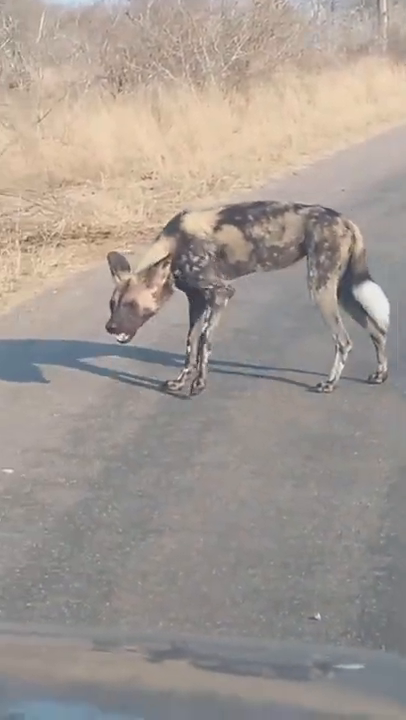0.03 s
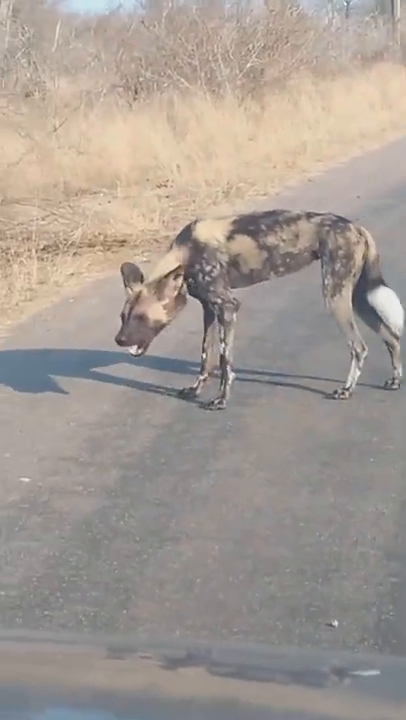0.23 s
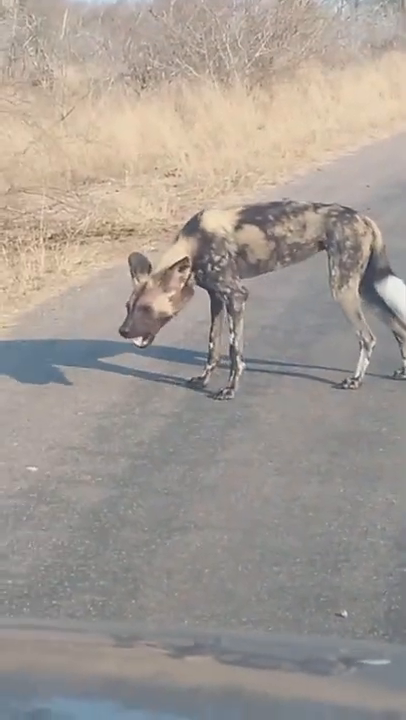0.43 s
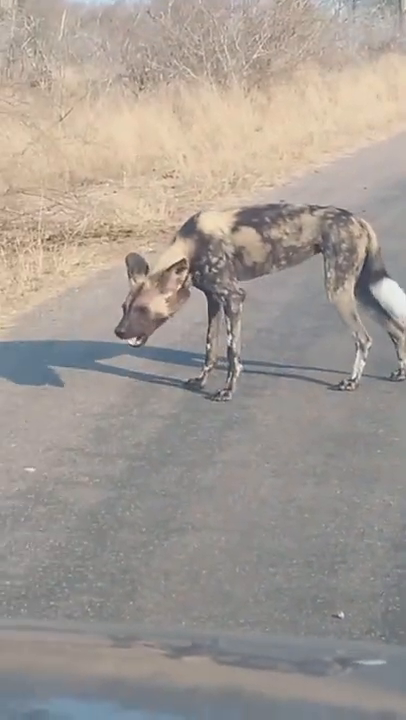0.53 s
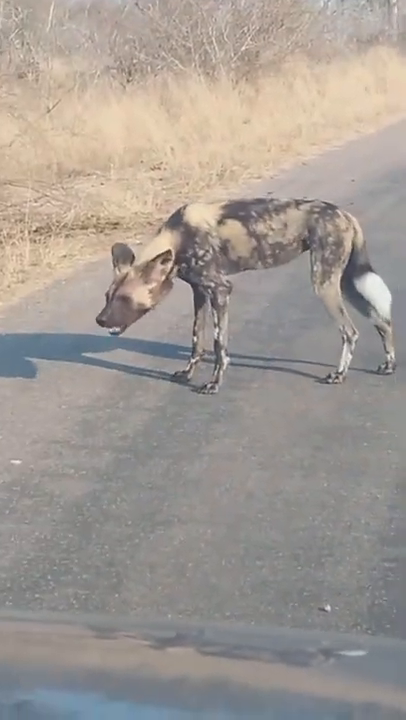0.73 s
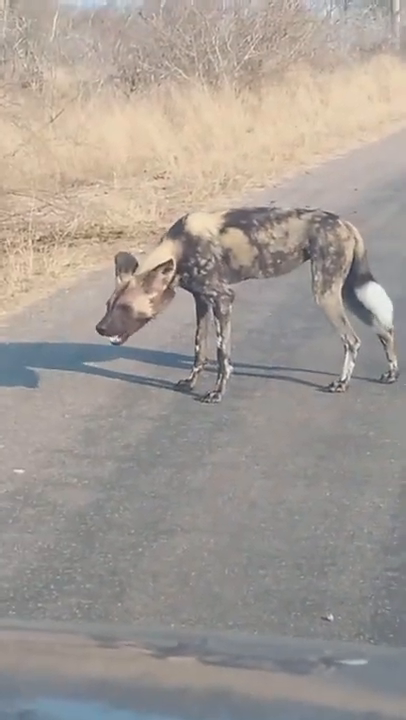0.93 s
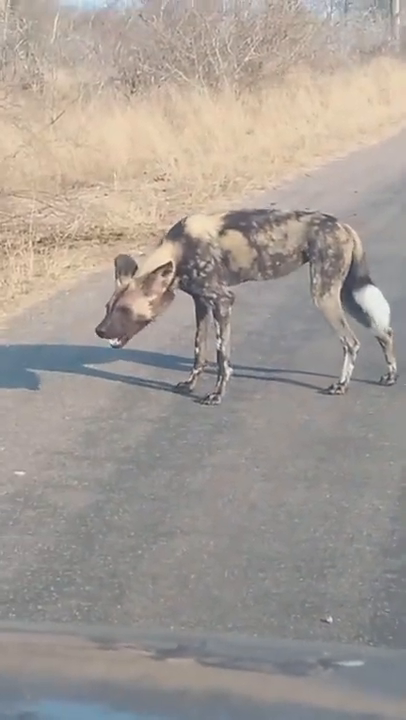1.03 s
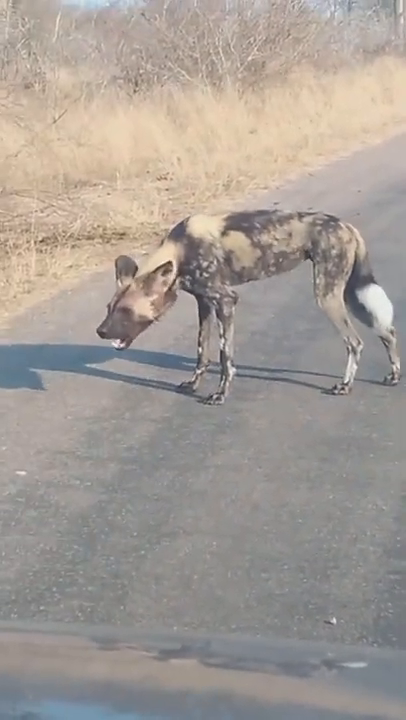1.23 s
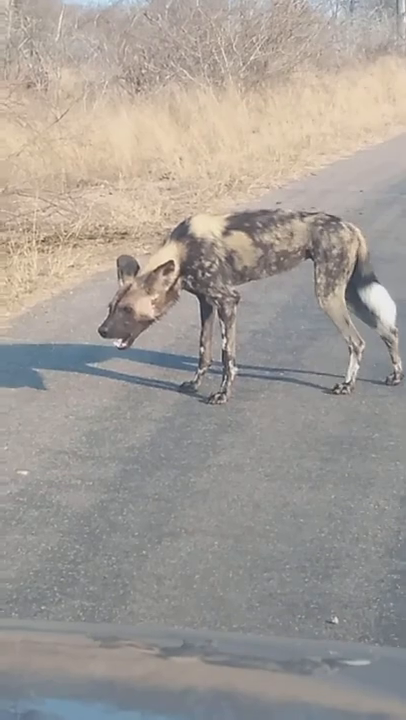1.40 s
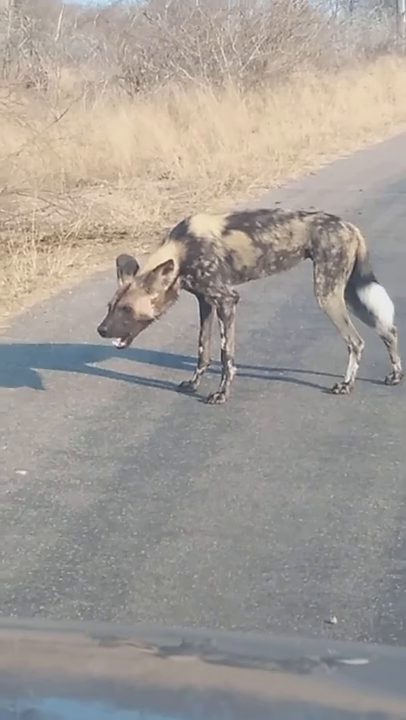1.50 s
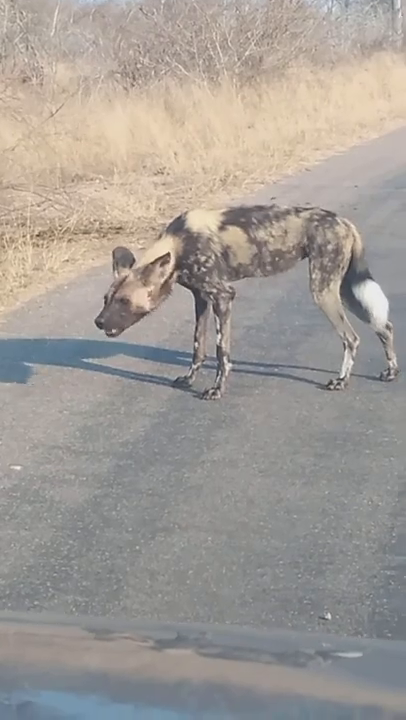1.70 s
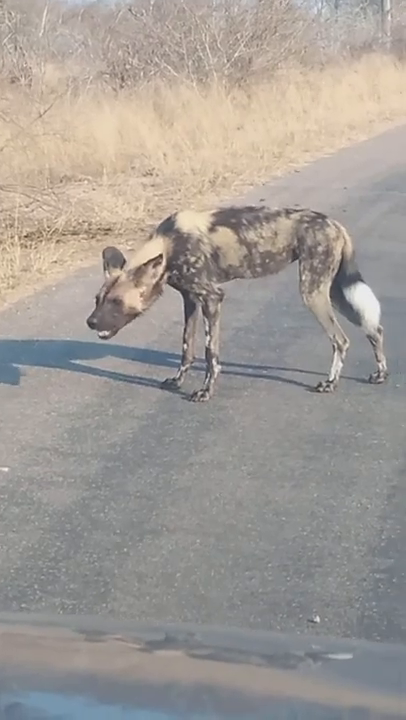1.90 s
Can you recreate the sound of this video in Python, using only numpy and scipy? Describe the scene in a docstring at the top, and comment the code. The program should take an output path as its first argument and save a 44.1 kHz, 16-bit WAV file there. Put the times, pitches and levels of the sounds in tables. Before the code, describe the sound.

Two soft, round wild dog hoots, the second much like the first, ring out on an open bush road with a faint lingering tail. Beneath them runs a steady low engine rumble with faint rattle and a barely audible bird.

```python
"""On a tar road in the bush, heard from an idling vehicle, a wild dog hoots twice with its head low.
Each hoot is an almost pure gliding tone: harmonics of one pitch, with throat hiss, puffs and thin whistles.
Discrete slaps and decaying noise echoes answer it. The engine adds unsteady low tones, rumble noise and a
resonant tappet rattle; behind lie a far bird's whistled notes, a faint treble rustle and air hiss."""
import sys
import numpy as np
from scipy import signal
from scipy.fft import rfft, irfft, next_fast_len
from scipy.io import wavfile
from scipy.ndimage import uniform_filter1d, map_coordinates

SR = 44100
rng = np.random.default_rng(int(sys.argv[2]) if len(sys.argv) > 2 else 0)


def invert_db(x):
    """Field ratio 10**(x/20) for x, a level in decibels (scalar or array-like)."""
    u = np.asarray(x, float) / 20
    return 10 ** u


def generate_wav(signal):
    """Clip the signal to [-1, 1] and save it as 16-bit WAV at the path in sys.argv[1]."""
    frames = np.transpose(np.atleast_2d(signal))
    scaled = np.clip(frames, -1, 1) * 32767
    pcm = np.round(scaled).astype(np.int16)
    wavfile.write(sys.argv[1], SR, pcm)


N = 85995
T = np.arange(N) / SR  # s

# Levels through each call. Each row: time in seconds, then levels in dB of the fundamental, of the group of
# harmonics 2-4, of the middle group 5-11, of the throat resonance group 11-16 and of the top group 16-21.
FIRST_CALL_LEVELS = [(0.17, -53, -74.5, -92.5, -87, -96), (0.18, -46, -54, -93, -88.5, -93),
                     (0.19, -48.5, -58, -101, -65, -103), (0.2, -41, -40.5, -100, -49.5, -106),
                     (0.22, -20, -62.5, -53.5, -70, -106), (0.238, -22, -59.5, -51.5, -43, -106),
                     (0.248, -22.5, -64, -58, -52, -88.5), (0.296, -19, -56, -50, -52, -86.5),
                     (0.312, -20, -57, -52.5, -61.5, -80.5), (0.35, -20, -51.5, -50, -58, -67),
                     (0.406, -21.5, -56, -44, -62.5, -70), (0.452, -21, -53, -42, -62, -65),
                     (0.502, -24.5, -58, -44.5, -56.5, -69), (0.526, -24.5, -53, -41.5, -74, -66.5),
                     (0.564, -26.5, -52, -42.5, -59.5, -66.5), (0.582, -24.5, -61.5, -48, -61.5, -67.5),
                     (0.596, -25, -52.5, -48.5, -50.5, -69.5), (0.625, -34, -64.5, -68.5, -52.5, -71)]
SECOND_CALL_LEVELS = [(1.18, -53.5, -66, -62, -68.5, -79.5), (1.196, -64.5, -55.5, -81, -85, -98.5),
                      (1.214, -41, -40.5, -78, -65, -86), (1.232, -23, -67, -71, -80.5, -104.5),
                      (1.248, -23, -62, -74, -39.5, -78), (1.266, -24, -70, -55.5, -45, -86),
                      (1.294, -21, -58, -54.5, -45.5, -87), (1.322, -21.5, -60, -52, -57, -75),
                      (1.376, -20, -58.5, -47.5, -66, -75), (1.398, -21.5, -49.5, -46.5, -53.5, -71),
                      (1.424, -24, -54, -46.5, -59, -71.5), (1.484, -25.5, -54, -46.5, -57, -71),
                      (1.522, -21.5, -49, -46.5, -59, -69.5), (1.534, -24, -53.5, -45.5, -55, -66),
                      (1.55, -23, -55.5, -46, -53, -73), (1.568, -24.5, -61, -53, -63, -71),
                      (1.59, -27.5, -53.5, -51, -48.5, -71), (1.61, -35.5, -90, -64, -66, -80)]
# Pitch glide of each call. Each row: time in seconds, pitch in Hz.
FIRST_CALL_PITCH = [(.17, 520), (.2, 532), (.211, 605), (.221, 650), (.24, 661), (.26, 671), (.28, 678),
                    (.31, 681.5), (.35, 683.5), (.4, 685.5), (.45, 689), (.5, 688), (.55, 683), (.575, 679),
                    (.6, 672), (.625, 672)]
SECOND_CALL_PITCH = [(1.18, 515), (1.214, 535), (1.225, 595), (1.236, 645), (1.247, 660), (1.27, 667),
                     (1.29, 673), (1.315, 681), (1.34, 678), (1.38, 679), (1.43, 681), (1.48, 682),
                     (1.53, 679), (1.56, 675), (1.6, 670)]
# Balance within the harmonic groups. Each row: multiple of the pitch (rounded for the sine), level
# relative to the group in dB in the first call, the same in the second call.
LOW_HARMONICS = [(2, 2.5, 1), (3, -16, -24.5), (4, -39.5, -33)]
MIDDLE_HARMONICS = [(5, -16.5, -14), (6, -25.5, -14), (7, -20.5, -15), (8, -5.5, -3), (9, -12, -19),
                    (10, -14.5, -21), (11, -15.5, -12.5)]
TOP_HARMONICS = [(15.8, -6.5, -9), (17, -0.5, -12), (18, -9.5, -15.5), (19, -8.5, -9), (20, -21.5, -3.5),
                 (21, -13.5, -3)]
# Throat resonance passed by harmonics 11-16. Each row: frequency in Hz, gain in dB.
THROAT_RESONANCE = [(7000, -47.5), (7700, -23.5), (8100, 3), (8700, -7.5), (9150, 0.5), (9500, -7),
                    (9900, -21.5), (10300, -13.5), (10900, -50.5)]
# Spectrum of the air hiss in the throat. Each row: frequency in Hz, relative level in dB.
THROAT_HISS_SPECTRUM = [(7200, -40.5), (7800, -7), (8300, 9.5), (9300, -6.5), (9700, -8), (10200, -39.5)]
# Rough puffs of the voice. Each row: start in seconds, length in seconds, level in dB, kind (0 start, 1 break).
VOICE_PUFFS = [(.205, .05, -65, 0), (.562, .05, -51, 1), (1.215, .06, -65, 0), (1.555, .06, -55, 1)]
# Spectra of the puffs. Each row: frequency in Hz, relative level in dB.
START_PUFF_SPECTRUM = [(2800, -34), (3400, -3.5), (3900, 9), (4400, -14.5), (6000, -17), (9900, -10.5),
                       (10500, -30)]
BREAK_PUFF_SPECTRUM = [(650, -20), (800, 8), (1300, -2), (1700, -20), (3000, -34), (4500, -24), (5600, -14),
                       (8600, -8), (10800, -13), (12000, -24), (13000, -50)]
# Thin whistles in the calls. Each row: start in seconds, length in seconds, from Hz, to Hz, level in dB.
VOICE_WHISTLES = [(0.187, 0.04, 9125, 9170, -55), (0.221, 0.1, 9130, 9370, -55),
                  (1.2, .06, 8580, 8600, -61), (1.206, 0.11, 9210, 9250, -61.5),
                  (0.589, .03, 8480, 8610, -47.5), (1.583, 0.033, 9720, 9535, -50.5),
                  (1.275, .03, 6250, 6320, -59), (1.295, .03, 6450, 6300, -64),
                  (.205, .04, 3450, 3950, -66), (1.215, .05, 3450, 3900, -65)]
# Stereo place of the direct voice. Each row: frequency in Hz, left minus right level in dB.
DOG_LEVEL_DIFFERENCE = [(300, 13.5), (680, -6.5), (1350, 5.5), (3400, -0.5), (5400, 2.5), (7000, 5.5),
                        (9000, 16), (14000, 11.5)]
# Each row: frequency in Hz, phase lead of left over right in radians.
DOG_PHASE_LEAD = [(680, 0.51), (1380, -1.72), (3400, -2), (4100, 2), (5500, -1.6), (7000, -1.56),
                  (8300, -2.5), (12000, 3.3)]
# Discrete slaps. Each row: delay in seconds, level in dB before the slap filter.
SLAPS = [(.045, -26.5), (.08, -28), (.112, -10), (.15, -31), (.21, -31.5)]
# Level of the scattered echoes. Each row: frequency in Hz, gain in dB.
BUSH_GAIN = [(700, -29), (1400, -19), (3500, -14), (9000, -8), (14000, -16)]
# Their decay. Each row: frequency in Hz, time to fall by 60 dB in seconds.
BUSH_T60 = [(400, 1), (1400, 0.95), (5000, 0.34), (9000, 0.44), (14000, 0.033)]
# Engine orders. Each row: frequency in Hz, level in dB, unsteadiness in dB.
ENGINE_ORDERS = [(62.6, -45, 1.5), (113, -48.5, 2.5), (165.5, -52, 2.2), (225, -60, 2)]
# Spectrum of the rumble. Each row: frequency in Hz, relative level in dB.
RUMBLE_SPECTRUM = [(15, -34.5), (25, -19), (45, -16.5), (80, -10), (98, -2.5), (135, -4), (192, -4),
                   (269, -9), (340, -8), (501, -16.5), (624, -15.5), (763, -24), (888, -26), (1000, -32),
                   (1160, -43), (1400, -41), (1820, -80.5), (3080, -120)]
# Correlation of the two channels of diffuse noise. Each row: frequency in Hz, correlation from -1 to 1.
CHANNEL_CORRELATION = [(60, -0.3), (130, 0.97), (290, 0.83), (640, 0.36), (1400, 0.87), (3090, 0.65),
                       (6790, -0.01), (14900, 0.6)]
# Stereo tilt of noise and engine tones. Each row: frequency in Hz, left minus right level in dB.
CABIN_LEVEL_DIFFERENCE = [(60, 1), (110, 1), (200, -1.5), (380, 3.5), (700, -3.5), (1290, -9.5),
                          (2370, 2.5), (4380, 2.5), (8090, 1), (14900, 1)]
# Notes of the far bird. Each row: start in seconds, length in seconds, from Hz, to Hz, level in dB.
BIRD_NOTES = [(1.765, .19, 6380, 6900, -74), (.93, .04, 6900, 7100, -85), (1.08, .1, 6880, 6900, -85),
              (.08, .04, 9250, 9250, -87), (.11, .05, 8000, 8000, -87), (.75, .13, 2480, 2460, -83)]
# Treble rustle. Each row: start in seconds, length in seconds, level in dB.
RUSTLES = [(0.08, 0.07, -73)]
# Spectrum of the air hiss. Each row: frequency in Hz, relative level in dB.
AIR_HISS_SPECTRUM = [(1120, -37), (1900, -10), (2200, -6), (3420, -18), (7120, -10), (8120, -17),
                     (12500, -18), (15400, -26), (15700, -90)]

JITTER = .0006  # share of the pitch
SETTLED_HZ = 652  # harmonics from the 5th up and throat hiss are full once the pitch reaches this
EDGE_S, EDGE_FRAY = .04, 4  # the voice is rougher at start and end
LATE_S, LATE_DB = .07, -22  # harmonics 9-11 of the middle group come in late
DIP_HZ, DIP_WIDTH_HZ, DIP_DB = 600, 40, -16  # harmonics 2-4 dip as the pitch passes here
SIXTH_DB = 9  # swell of the 6th harmonic where the voice is rough
TOP_TILT = 0.084  # dB per dB the top group weakens, per multiple above the 16th
WAVER_DB, WAVER_RATE, FRAY_RAD = 2.5, 20, .3  # level and phase unsteadiness of harmonics; knots a second
THROAT_HISS_DB = -8  # relative to the throat resonance group
SLAP_LOW_HZ, SLAP_STEEP = 635, 24  # slaps carry the held tone, hardly the scoop under it
BUSH_GAP_S = .03
FAR_DB, FAR_T60 = -21, 6.2  # faint late echoes of the low tone: relative dB, s
RUMBLE_DB, HISS_DB = -46, -81
UNEVEN_HZ, UNEVEN_DB = 720, 4  # above this, rumble and air hiss drift slowly in level
RATTLE_HZ, RATTLE_WIDTH_HZ, RATTLE_DB = 1605.6, 72.5, -65
RATTLE_RATE, RATTLE_SPREAD_DB = 17, 2  # beats a second, irregularity


def unit(x):
    """Normalisation to an rms value of 1."""
    return x / np.sqrt(np.mean(x ** 2) + 1e-20)


def along(points, hz):
    """Interpolation of (Hz, value) points on a logarithmic frequency axis."""
    f, v = np.transpose(points)
    return np.interp(np.log(hz + 1), np.log(f + 1), v)


def wobble(rate):
    """Slow random modulation: a spline through up to 199 normal deviates, rate knots a second, then held."""
    return map_coordinates(rng.standard_normal(200), [np.clip(T * rate, 0, 198)])


def filtered(x, response):
    """Linear filtering: the spectrum is multiplied by a complex response of frequency."""
    m = next_fast_len(N + SR // 2)
    return irfft(rfft(x, m) * response(np.fft.rfftfreq(m, 1 / SR)), m)[..., :N]


def sides(db, rad=0):
    """Interaural cues: left and right gains with a given level and phase difference."""
    left = invert_db(db / 2) * np.exp(.5j * rad)
    right = invert_db(-db / 2) * np.exp(-.5j * rad)
    return np.array([left, right]) * 2 / (invert_db(db / 2) + invert_db(-db / 2))


def swell(start, length):
    """Amplitude envelope: a half sine raised to a power gives a soft rise and fall."""
    return np.sin(np.pi * np.clip((T - start) / length, 0, 1)) ** .7


def note(s, length, from_hz, to_hz, db, flutter_db):
    """Frequency modulation: a thin sine glides to its mark and slightly back, with random flutter."""
    glide = np.sin(np.clip((T - s) / length, 0, 1) * 2)
    hz = from_hz + (to_hz - from_hz) * glide + 15 * wobble(40)
    level = np.sqrt(2) * invert_db(db + flutter_db * wobble(40)) * swell(s, length)
    return level * np.sin(2 * np.pi * np.cumsum(hz) / SR)


def rush(spectrum, patchy_db, slow_db=0):
    """Diffuse noise: shaped stereo noise of rms 1, its gain random over time and frequency."""
    z = signal.stft(rng.standard_normal((2, N)), nperseg=512)[2]
    patches = uniform_filter1d(uniform_filter1d(rng.standard_normal(z.shape[1:]), 4, 0), 10, 1)
    drift = uniform_filter1d(uniform_filter1d(rng.standard_normal(z.shape[1:]), 5, 0), 30, 1)
    slow_db = slow_db * (np.arange(len(z[0])) * SR / 512 > UNEVEN_HZ)[:, None]
    gain = invert_db(patchy_db * unit(patches) + slow_db * unit(drift))
    pair = signal.istft(z * gain, nperseg=512)[1][:, :N]

    def mid_side(hz):
        # the share of mid to side noise sets the correlation of left and right
        turn = np.arccos(np.clip(along(CHANNEL_CORRELATION, hz), -1, 1)) / 2
        return invert_db(along(spectrum, hz)) * np.array([np.cos(turn), np.sin(turn)])

    mid, side = filtered(pair, mid_side)
    stereo = np.array([mid + side, mid - side])
    return unit(filtered(stereo, lambda hz: sides(along(CABIN_LEVEL_DIFFERENCE, hz))))


def hoot(rows, glide, column):
    """Harmonic synthesis: sines on multiples of one pitch, in groups of own level, plus throat hiss."""
    s, *dbs = np.transpose(rows)
    gate = np.clip(np.minimum(T - s[0], s[-1] - T) / 0.013, 0, 1)
    pitch = uniform_filter1d(np.interp(T, *np.transpose(glide)), size=300) * (1 + JITTER * wobble(60))
    phase = 2 * np.pi * np.cumsum(pitch) / SR
    tone, second, middle, high, top = [uniform_filter1d(np.interp(T, s, d), size=300) for d in dbs]
    onset = np.exp(-((T - s[0] - EDGE_S) / EDGE_S) ** 2)
    ending = np.exp(-((T - s[-1] + EDGE_S / 2) / EDGE_S * 2) ** 2)
    rough = 1 + EDGE_FRAY * (onset + ending)

    def sine(k, db, waver):
        level = np.sqrt(2) * invert_db(db + waver * wobble(WAVER_RATE))
        start_phase = rng.uniform(0, 2 * np.pi)
        fray = FRAY_RAD * rough * waver / WAVER_DB * wobble(120)
        return level * np.sin(k * phase + start_phase + fray)

    second = second + DIP_DB * np.exp(-((pitch - DIP_HZ) / DIP_WIDTH_HZ) ** 2)
    late = LATE_DB * np.exp(-(np.clip(T - s[0] - EDGE_S, 0, 1) / LATE_S) ** 2)
    sixth = SIXTH_DB * (rough - 1) / EDGE_FRAY
    low = sine(1, tone, 0)
    for row in LOW_HARMONICS:  # the higher, the less steady
        low = low + sine(round(row[0]), second + row[column], WAVER_DB * (row[0] - 1))
    upper = np.zeros(N)
    for row in MIDDLE_HARMONICS:
        k = round(row[0])
        upper += sine(k, middle + row[column] + late * (row[0] > 8.5) + sixth * (k == 6), WAVER_DB)
    for k in range(11, 17):
        upper += sine(k, high + along(THROAT_RESONANCE, k * pitch), WAVER_DB)
    for row in TOP_HARMONICS:
        tilt = TOP_TILT * (row[0] - 16) * (top - top.max())
        upper += sine(round(row[0]), top + row[column] + tilt, WAVER_DB)
    hiss = unit(filtered(rng.standard_normal(N), lambda f: invert_db(along(THROAT_HISS_SPECTRUM, f))))
    upper += invert_db(THROAT_HISS_DB + high) * hiss * (1 + .5 * np.sin(phase))  # pulses with the voice
    return gate * (low + upper * np.clip((pitch - SETTLED_HZ) / 12 + 1, 0, 1))


def puffs():
    """Turbulence: short bursts of shaped noise where the voice starts and breaks."""
    kinds = [unit(filtered(rng.standard_normal(N), lambda f: invert_db(along(p, f))))
             for p in (START_PUFF_SPECTRUM, BREAK_PUFF_SPECTRUM)]
    return sum(invert_db(db) * swell(s, length) ** 2 * kinds[round(kind)] for s, length, db, kind in VOICE_PUFFS)


def voice_whistles():
    """Narrow tones: thin gliding sines near the start and end of each call."""
    return sum(note(*w, flutter_db=4.5) for w in VOICE_WHISTLES)


def slaps(x):
    """Discrete reflection: delayed copies of the voice, band-limited to its held low tone."""
    def response(hz):
        delays = sum(invert_db(db) * np.exp(-2j * np.pi * hz * s) for s, db in SLAPS)
        treble_loss = 1 + (hz / 1200) ** 4
        bass_loss = 1 + (SLAP_LOW_HZ / (hz + 1)) ** SLAP_STEEP
        return sides(-2 + 0 * hz) * delays / treble_loss / bass_loss

    return filtered(x, response)


def bush(x):
    """Reverberation: scattered echoes from grass and thicket, each frequency decaying at its own speed."""
    hz, t, z = signal.stft(rng.standard_normal((2, SR)), SR, nperseg=256)
    near = invert_db(-60 * t / along(BUSH_T60, hz)[:, None])
    far = invert_db(FAR_DB - 60 * t / FAR_T60) * (hz < 900)[:, None]
    tail = signal.istft(z * (near + far), SR, nperseg=256)[1]
    tail = np.array([tail[0] + 0.14 * tail[1], tail[0] - 0.14 * tail[1]])
    delayed = np.pad(x, (int(BUSH_GAP_S * SR), 0))[None]
    return signal.fftconvolve(delayed, tail / np.linalg.norm(tail[0]), axes=1)[:, :N]


def dog():
    """Superposition: the two calls with puffs and whistles, as direct sound, slaps and scattered echoes."""
    first = hoot(FIRST_CALL_LEVELS, FIRST_CALL_PITCH, column=1)
    second = hoot(SECOND_CALL_LEVELS, SECOND_CALL_PITCH, column=2)
    parts = first, second, puffs() + voice_whistles()
    voice = sum(parts)
    direct = filtered(voice, lambda hz: sides(along(DOG_LEVEL_DIFFERENCE, hz), along(DOG_PHASE_LEAD, hz)))
    # each part has its own random pattern of echoes
    scattered = filtered(sum(bush(part) for part in parts), lambda hz: invert_db(along(BUSH_GAIN, hz)))
    return direct + slaps(voice) + scattered


def engine_orders():
    """Periodic excitation: low engine tones whose level, frequency and phase wander."""
    tones = np.zeros(N)
    for hz, db, unsteady in ENGINE_ORDERS:
        level = np.sqrt(2) * invert_db(db + unsteady * wobble(11))
        turns = hz * np.cumsum(1 + 0.0083 * wobble(2.7)) / SR
        tones += level * np.sin(2 * np.pi * turns + 0.51 * unsteady * wobble(14))
    return filtered(tones, lambda hz: sides(along(CABIN_LEVEL_DIFFERENCE, hz)))


def tappet_rattle():
    """Resonance: noise pulsing at an irregular beat rings one small part, a doubled band-pass."""
    turn = np.cumsum(RATTLE_RATE * (1 + 0.31 * wobble(13))) / SR
    beat = invert_db(4.2 * np.cos(2 * np.pi * turn) + RATTLE_SPREAD_DB * wobble(10))

    def peak(f):
        damping = 1j * f * RATTLE_WIDTH_HZ
        return (damping / (RATTLE_HZ ** 2 - f * f + damping)) ** 2

    a, b = rng.standard_normal((2, N)) * beat
    return invert_db(RATTLE_DB) * unit(filtered(np.array([a + 0.41 * b, a - 0.84 * b]), peak))


def rumble():
    """Broadband noise: a low rumble, uneven in time and frequency."""
    return invert_db(RUMBLE_DB) * rush(RUMBLE_SPECTRUM, patchy_db=1.0, slow_db=UNEVEN_DB)


def engine():
    """Superposition: engine orders, rattle and rumble add linearly."""
    return engine_orders() + tappet_rattle() + rumble()


def far_bird():
    """Amplitude panning: faint whistled notes, stronger on the left."""
    return sum(note(*b, flutter_db=2.5) for b in BIRD_NOTES) * invert_db(np.array([[2.5], [-2.5]]))


def rustle():
    """Band-limited noise: a faint treble rustle under a soft envelope."""
    spectrum = [(9000, -40), (11500, -6), (13800, 0), (14800, -3), (15500, -40)]  # Hz, dB
    fizz = rush(spectrum, patchy_db=3)
    return sum(invert_db(db) * swell(s, length) for s, length, db in RUSTLES) * fizz


def air_hiss():
    """Broadband noise: a quiet hiss of air, uneven in time and frequency."""
    return invert_db(HISS_DB) * rush(AIR_HISS_SPECTRUM, patchy_db=2.5, slow_db=UNEVEN_DB)


def scene():
    """Superposition of dog, vehicle, bird, rustle and air."""
    return dog() + engine() + far_bird() + rustle() + air_hiss()


def top_cut(x):
    """Nothing passes above the cut-off."""
    return signal.sosfilt(signal.butter(12, 15540, fs=SR, output="sos"), x)


def record(dry):
    """Final stage of the signal chain: the finished mix of all sources goes to the output."""
    return top_cut(dry)


dry = scene()
out = record(dry)
generate_wav(out)
```